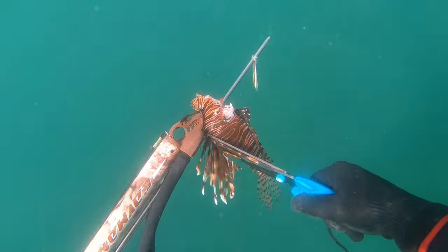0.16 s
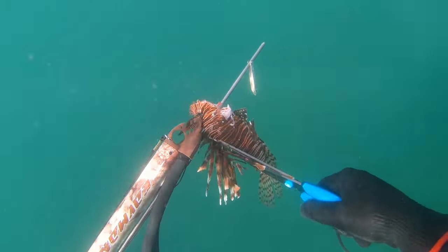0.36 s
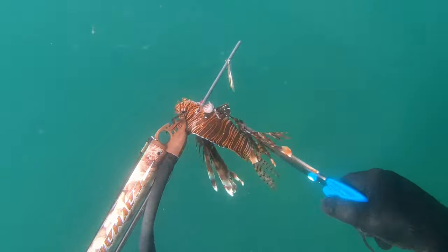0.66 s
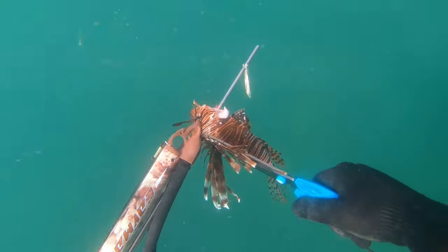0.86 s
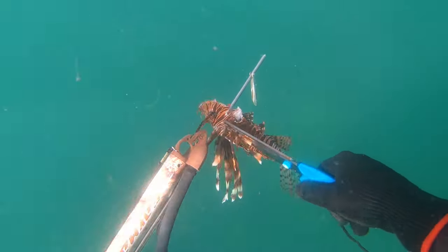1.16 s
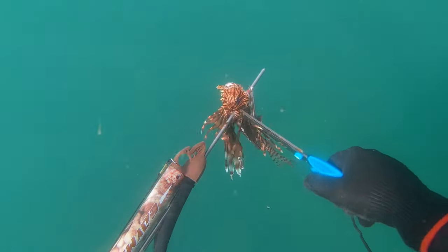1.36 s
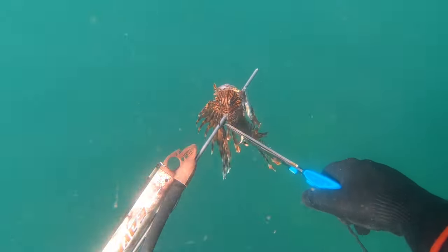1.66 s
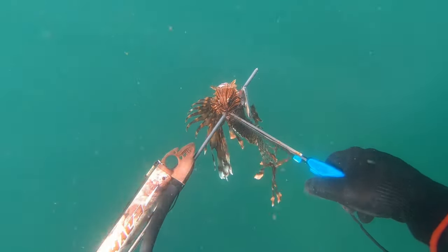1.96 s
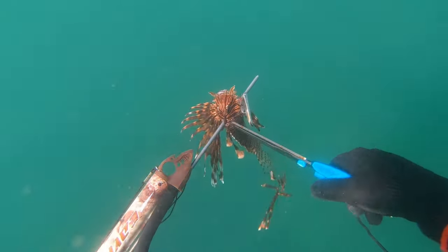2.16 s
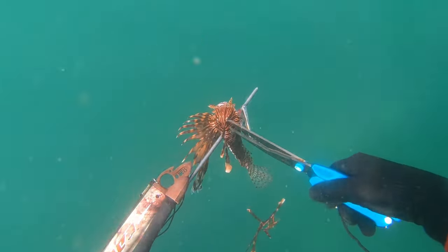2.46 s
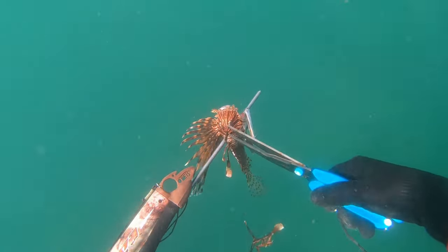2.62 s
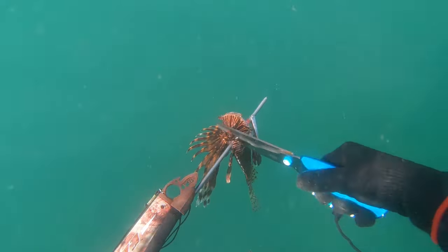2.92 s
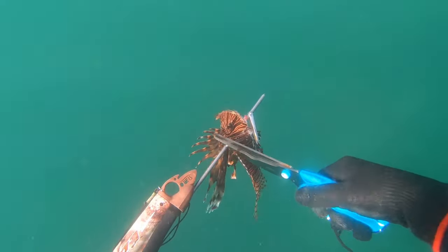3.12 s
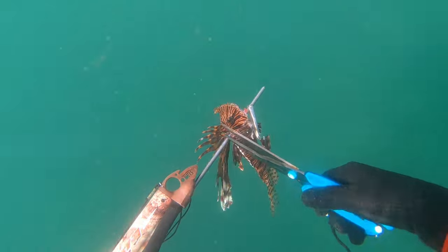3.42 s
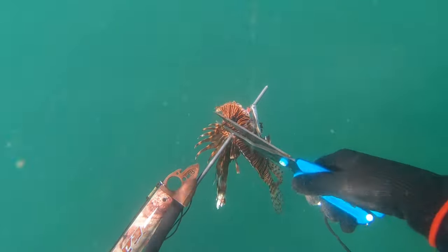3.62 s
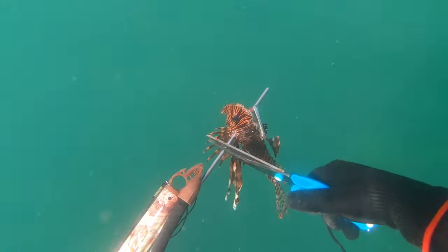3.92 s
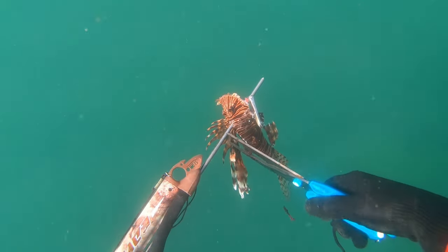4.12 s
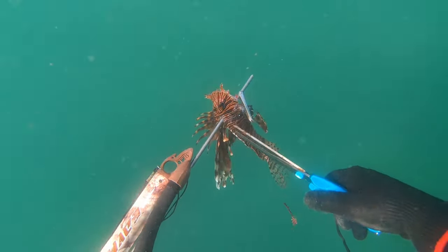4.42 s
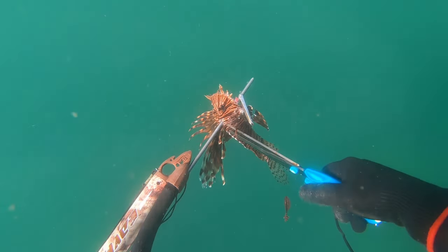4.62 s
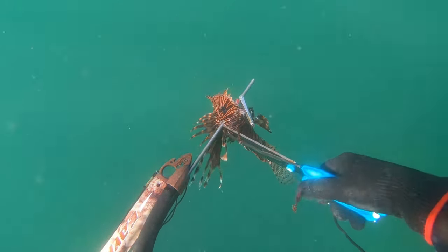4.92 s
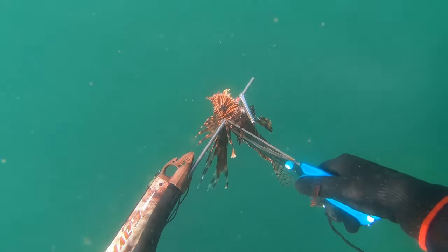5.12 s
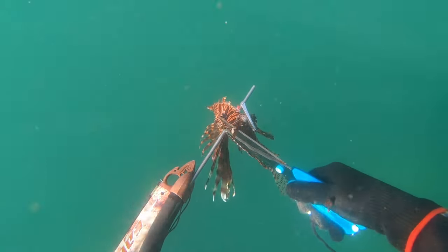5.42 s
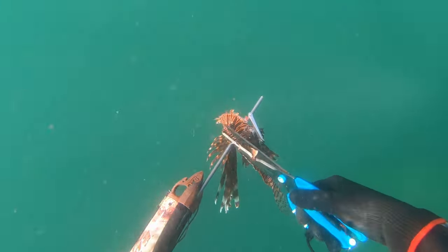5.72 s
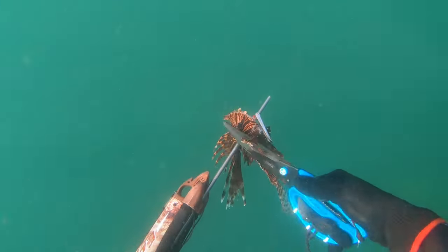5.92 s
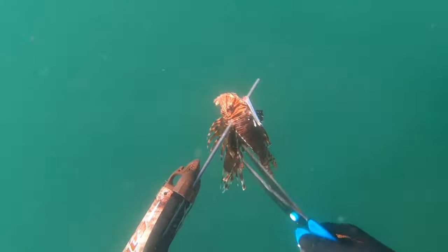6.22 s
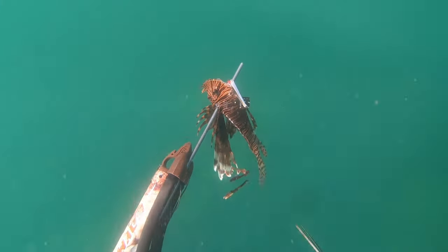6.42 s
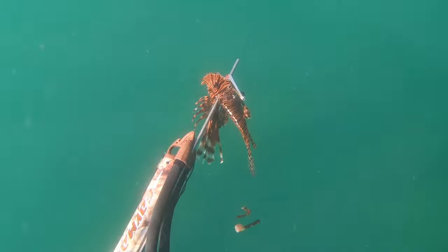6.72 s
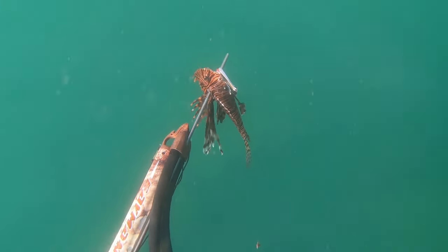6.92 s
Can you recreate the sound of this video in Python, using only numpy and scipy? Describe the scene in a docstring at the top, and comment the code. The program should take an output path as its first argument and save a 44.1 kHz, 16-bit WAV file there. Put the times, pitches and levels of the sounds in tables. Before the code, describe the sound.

Underwater, shears snip through fish spines with a few sharp crunches, over constant crackling shrimp snaps, a steady high hiss and faint low murmur.

```python
"""Under water by a spearfishing diver: shears trim the spines off a speared fish, heard in a camera housing.
Bursts of grainy force ring the shears as spines break; softer contacts ring the speargun, and steel
rubs along it as swelling resonant noise. Jolts are low fading sines, bubbles gliding ones.
Snapping shrimp crackle all around: a spike and rattle in the housing, then scatter from the seabed.
Behind them lie a hiss of distant snaps, a low murmur and lumpy eddies, all shaped from noise."""
import sys
import numpy as np
from scipy import signal
from scipy.fft import rfft, irfft, next_fast_len
from scipy.io import wavfile
from scipy.ndimage import uniform_filter1d

SR = 44100
rng = np.random.default_rng(int(sys.argv[2]) if len(sys.argv) > 2 else 0)


def output_pcm(signal):
    """Save a mono or channel-first signal as 16-bit PCM at the path in sys.argv[1].

    Samples are clipped to [-1, 1] before scaling.
    """
    pcm = np.clip(np.atleast_2d(signal).T, -1, 1) * 32767
    wavfile.write(sys.argv[1], SR, np.round(pcm).astype(np.int16))


N = 311787
TIME = np.arange(N) / SR

# blades going through a spine: (break time [s], level [dB], swell [s], fade [s], tilt [dB/octave])
SPINE_CUTS = [(0.2746, -15.5, 0.0039, 0.002, -3), (0.2979, -7, 0.00076, 0.00038, -3.5),
              (1.0536, -22, 0.00089, 0.001, -15), (1.0970, -29, 0.00036, 0.0042, -1),
              (3.0544, -28, 0.0094, 0.0011, -2.5), (3.795, -23, 0.0014, 0.0014, 0),
              (3.8120, -31, 0.01, 0.0011, -0.5), (3.8169, -22, 0.0024, 0.0011, -0.5),
              (3.8202, -24.5, 0.001, 0.0014, -3), (5.7572, -31, 0.0016, 0.0025, 8),
              (6.0286, -24, 0.00054, 0.0013, 6), (6.043, -31, 0.0061, 0.0066, -4),
              (6.051, -17, 0.0014, 0.0025, 4.5)]
# resonances of the shears: (centre [Hz], width [Hz], level [dB])
SHEARS_MODES = [(149, 134, -15.5), (357, 140, -24), (640, 170, -23.5), (886, 94, -20.5), (1394, 196, -20),
                (2284, 127, -7.5), (3000, 400, -8.5), (3440, 420, 1), (4070, 63, -11), (5083, 213, 3.5),
                (5520, 530, -6), (6900, 710, -14), (7840, 1000, -16), (10800, 3700, -41)]
# tools knocking on the spear: (time [s], level [dB], tilt [dB/octave])
SPEAR_KNOCKS = [(0.554, -53, -9), (1.053, -33, 1.5), (1.0970, -35.5, 0.5), (1.1110, -43, 2),
                (1.235, -42, 2), (3.0569, -45.5, 5), (3.442, -53, 0), (3.8190, -46, 9), (3.9738, -48.5, -3),
                (4.031, -44.5, -10), (4.1303, -41, 15), (4.165, -42.5, 16), (5.1336, -36.5, 13.5),
                (5.7546, -37, 16.5), (5.7950, -51, -1), (6.051, -38.5, 0), (6.2455, -62, 22),
                (6.2741, -42, 24), (6.892, -45.5, 18), (7.0433, -50, 5)]
# resonances of the speargun: (centre [Hz], width [Hz], level [dB])
SPEARGUN_MODES = [(298, 370, -0.5), (604, 76, 3), (880, 134, -2), (1414, 130, 11.5), (1540, 130, 1.5),
                  (1746, 49, 4), (2300, 750, -2), (3230, 420, -4.5)]
# strokes of the blades along the spear: (time of hardest press [s], level [dB], swell and fade [s])
BLADE_STROKES = [(.56, -54.5, 0.017), (1.18, -42.5, 0.016), (1.255, -60, 0.15), (4.10, -70, .012),
                 (4.22, -46.5, 0.019), (5.17, -60, 0.024), (5.89, -56, 0.13), (6.045, -41, 0.016),
                 (6.26, -51.5, 0.016), (7.06, -68, 0.054)]
# ring of the sliding blades: (centre [Hz], width [Hz], level [dB])
SLIDE_MODES = [(816, 240, -7.5), (1384, 95, 2), (1710, 250, -3), (2260, 150, -1), (3030, 1450, 0)]
# jolts through the diver's arm: (start time [s], level [dB], pitch [Hz], fade [s])
ARM_JOLTS = [(0.273, -38, 93, 0.021), (.296, -34.5, 35.5, 0.02), (0.925, -28, 58.5, 0.0097),
             (1.049, -41.5, 113, 0.013), (3.056, -42, 48, 0.023), (3.817, -47, 70, 0.025),
             (4.033, -41.5, 70, 0.0096), (5.731, -47.5, 103, 0.02), (6.054, -27, 46.7, 0.015)]
# loose bubbles: (start time [s], level [dB], starting pitch [Hz], glide [octaves/s], life [s])
LOOSE_BUBBLES = [(0.92, -42, 620, -23, 0.0059), (0.9257, -47.5, 396, -12, 0.014),
                 (0.928, -33, 106.4, -1.5, 0.053), (.9270, -40.5, 173, -12, 0.033),
                 (1.103, -42, 179, -15, 0.027), (1.2357, -34.5, 1400, -2, 0.0084),
                 (3.9739, -40, 1650, 9, 0.0081), (6.0102, -40, 454, 5, 0.092)]
# nearest shrimp, standing out of the crackle: (time [s], level [dB], tilt [dB/octave])
NEAR_SNAPS = [(0.3564, -36.5, -7.5), (.372, -35.5, -5), (0.468, -32.5, -6.5), (.5398, -38.5, -3),
              (.659, -34.5, -6.5), (0.739, -40, 11), (0.816, -34.5, 5), (0.9498, -36, 1), (1.1198, -39, -3),
              (1.2253, -38.5, -2), (1.3592, -40, 10), (1.3896, -36.5, -5), (1.4748, -35, 1),
              (1.5196, -33, -5.5), (1.5466, -32, -8), (1.5923, -35, 23), (1.615, -29.5, -4.5),
              (1.7073, -36, -8), (1.7168, -29.5, -11), (1.7517, -33, 3), (1.8088, -30.5, 6),
              (1.869, -38, 3), (1.8754, -34.5, 0), (1.8996, -39.5, -1), (1.9495, -37, -4),
              (1.9895, -28.5, -7.5), (2.0126, -53, 4), (2.0571, -37, 3), (2.0893, -35.5, -2.5),
              (2.1669, -26.5, -4), (2.2088, -32.5, 0.5), (2.2347, -30.5, -13.5), (2.2564, -42, -11),
              (2.3918, -38.5, 23), (2.433, -30, -5.5), (2.6249, -39, 19), (2.647, -31, -10),
              (2.6945, -33, 37), (2.7224, -37, 4.5), (2.77, -37, 10), (2.8483, -31, -9),
              (2.8702, -33, -3.5), (2.9163, -31, -5), (3.1543, -31.5, 11), (3.3951, -29.5, 1.5),
              (3.4405, -35, -14.5), (3.5143, -35, -6.5), (3.5885, -41, 22), (3.6165, -35.5, -0.5),
              (3.9154, -37.5, 2), (4.0525, -23.5, -6), (4.121, -37, -6), (4.1297, -36, -10),
              (4.1951, -31.5, -11), (4.3686, -38, -5), (4.4588, -39.5, 13), (4.4897, -41.5, 3),
              (4.5136, -34.5, 6), (4.6236, -28, -2), (4.8153, -39, 3.5), (5.2124, -37.5, 3),
              (5.2896, -26.5, -2.5), (5.4017, -39.5, -5), (5.461, -30, -10), (5.6472, -36.5, 6),
              (5.6912, -37, -5.5), (5.7927, -38, 7), (5.8504, -38.5, -2), (5.8886, -31, -2),
              (5.9698, -36.5, -.5), (6.0028, -33.5, -8), (6.148, -35.5, -1.5), (6.1907, -39, 24),
              (6.2134, -35.5, -4), (6.2535, -31.5, -7), (6.2654, -28.5, -4), (6.337, -40, -6),
              (6.434, -38, -8.5), (6.4939, -38.5, 2), (6.724, -41, -5.5), (6.7833, -38.5, -2)]
# resonances of the camera housing: (centre [Hz], width [Hz], level [dB])
HOUSING_MODES = [(1420, 98, -28), (1870, 110, -32), (2330, 195, -20.5), (2765, 330, -16.5), (3244, 286, -6),
                 (3690, 596, -7), (5046, 183, 0), (5392, 470, 1), (6806, 790, -2), (7640, 330, -8.5),
                 (8274, 495, -5), (9230, 830, -14.5), (10400, 2700, -28), (14600, 2900, -41)]
# arm sweeps pushing water past the housing: (time of fastest moment [s], level [dB], swell and fade [s])
ARM_SWEEPS = [(.32, -57, 0.085), (.57, -55, 0.14), (1.12, -54, 0.18), (2.91, -63, 0.12), (3.63, -65, 0.23),
              (4.29, -52, .11), (4.46, -52, .06), (4.58, -59.5, 0.068), (5.77, -56.5, 0.096),
              (6.29, -56, 0.039), (6.67, -59, 0.088), (6.88, -52.5, 0.34)]
# relative spectrum of eddies on the housing: (frequency [Hz], density [dB per Hz])
EDDY_COLOUR = [(12, -38), (20, -38), (59, 8.5), (92, -12), (141, 1.5), (206, -3.5), (261, -17), (422, -18),
               (565, -26.5), (670, -16.5), (1010, -38), (1200, -30), (1560, -63), (2640, -120)]
# relative spectrum of the still sea: (frequency [Hz], density [dB per Hz])
STILL_SEA_COLOUR = [(8.8, -41), (15, 3.5), (64, -5), (87, -24), (173, -3), (233, -11.5), (266, -15.5),
                    (297, -14), (352, -21), (416, -19.5), (572, -22), (771, -17), (1100, -28), (1300, -27),
                    (1690, -62), (2860, -120)]
# stereo width by frequency: (frequency [Hz], side relative to mid [dB])
SIDE_COLOUR = [(60, -53), (400, -28), (1200, -33), (3000, -53), (5000, -34), (8000, -30), (10000, -24.5),
               (12000, -5.5), (15000, 0)]
# relative spectrum of the microphones' own hiss: (frequency [Hz], level [dB])
SELF_NOISE_COLOUR = [(100, 5), (1000, -2), (9000, -1), (12500, 3), (14500, 0), (15800, -12)]

SLIDE_FLOOR_DB = -69  # faint noise in the slide's colour beneath the strokes
# a typical near snap, its seabed scatter, and dB of scatter per dB of snap:
# scatter weakens more slowly with distance than the snap itself
TYPICAL_SNAP_DB, SCATTER_DB, SCATTER_FOLLOWS = -34.5, -44.5, 0.57
# the rest of the colony is spread evenly over the seabed between two distances
COLONY_NEAR_M, COLONY_FAR_M = 3.22, 8.4
COLONY_NEAR_DB, COLONY_SCATTER_DB = -40.5, -53.5  # a snap from the near edge; scatter of every snap
COLONY_TILT_DB, COLONY_TILT_SPREAD_DB = 5.5, 10.5  # mean and standard deviation, dB per octave
HISS_DB, SEA_DB, SELF_NOISE_DB = -55.5, -63, -82.5  # distant snaps, still sea, microphone hiss
CUTOFF_HZ = 15900


def cuts():
    """The blades squeeze each spine until it breaks, ringing the shears."""
    s, db, swell, fade, tilt = np.transpose(SPINE_CUTS)
    return crunch(s, db, swell, fade, tilt, SHEARS_MODES, grain_db=3.5, break_db=9.5, tilt_from_hz=1450)


def knocks(contact_s=0.00013, fade_s=0.0075):
    """Dull contacts ring the speargun: a very short onset, then a longer grainy fade."""
    s, db, tilt = np.transpose(SPEAR_KNOCKS)
    swell = np.full(len(s), contact_s)
    fade = np.full(len(s), fade_s)
    return crunch(s, db, swell, fade, tilt, SPEARGUN_MODES, grain_db=4.5, break_db=15.5, tilt_from_hz=900)


def crunch(s, db, swell, fade, tilt, modes, grain_db, break_db, tilt_from_hz, size=6144):
    """Dense tiny fractures or slips build to one sharp break, die away and ring a body."""
    lead = size // 3  # samples of build-up before the break
    t = (np.arange(size) - lead) / SR
    force = np.exp(np.minimum(t / swell[:, None], -t / fade[:, None]))
    grain_gain = from_db(grain_db * rng.standard_normal(force.shape))
    grains = rng.standard_normal(force.shape) * grain_gain
    grains[:, lead] = from_db(break_db)
    rung = through(force * grains, modes, tilt, low_cut_hz=6.9, tilt_from_hz=tilt_from_hz)
    energy = np.sum(force ** 2, axis=1, keepdims=True)
    return place(s - lead / SR, from_db(db)[:, None] * with_energy(rung, energy))


def slide():
    """Steel rubs along the spear in uneven slips, heard as resonant noise that swells with the press."""
    press = np.hypot(swells(BLADE_STROKES), from_db(SLIDE_FLOOR_DB))
    slips = press * uneven(spread_db=2.0, lump_s=0.018)
    return slips * noise(lambda hz: resonances(SLIDE_MODES, hz))


def jolts(push_s=0.0013, size=8192):
    """The camera mount sways after each push through the diver's arm: a low sine that soon fades."""
    s, db, hz, fade = np.transpose(ARM_JOLTS)[:, :, None]
    t = np.arange(size) / SR
    envelope = (1 - np.exp(-t / push_s)) * np.exp(-t / fade)
    return place(s[:, 0], from_db(db) * envelope * np.sin(2 * np.pi * hz * t))


def bubbles(birth_s=0.00039, size=8192):
    """Each pocket of air rings at one pitch that glides as its shape and depth change."""
    s, db, hz, glide, life = np.transpose(LOOSE_BUBBLES)[:, :, None]
    t = np.arange(size) / SR
    pitch_hz = hz * 2 ** (glide * np.minimum(t, 2 * life))  # the glide stops after two lives
    phase = 2 * np.pi * np.cumsum(pitch_hz, axis=1) / SR
    envelope = (1 - np.exp(-t / birth_s)) * np.exp(-(t / life) ** 4.4)
    return place(s[:, 0], from_db(db) * envelope * np.sin(phase))


def near_shrimp():
    """Single snaps close by: the louder the snap, the drier it sounds against its scatter."""
    s, db, tilt = np.transpose(NEAR_SNAPS)
    scatter_db = SCATTER_DB + SCATTER_FOLLOWS * (db - TYPICAL_SNAP_DB)
    return snaps(s, db, tilt, scatter_db)


def far_shrimp(count=420):
    """The rest of the colony: random snaps, fainter with distance, over a hiss of countless farther ones."""
    when, area, colour = rng.random((count, 3)).T
    distance_m = np.sqrt(COLONY_NEAR_M ** 2 + area * (COLONY_FAR_M ** 2 - COLONY_NEAR_M ** 2))
    db = COLONY_NEAR_DB - 20 * np.log10(distance_m / COLONY_NEAR_M)
    tilt = COLONY_TILT_DB + COLONY_TILT_SPREAD_DB * np.sqrt(3) * (2 * colour - 1)
    crackle = snaps(when * N / SR, db, tilt, np.full(count, COLONY_SCATTER_DB))
    hiss = noise(lambda hz: resonances(HOUSING_MODES, hz))
    return crackle + from_db(HISS_DB) * hiss


def snaps(s, db, tilt, echo_db, rattle_s=0.0014, rattle_spread_db=2, direct=3.0,
          echo_s=0.012, echo_delay_s=0.0034, echo_grain_db=3.5, echo_tilt_share=0.93,
          low_cut_hz=1300, tilt_from_hz=1900, size=2048):
    """A collapsing cavity: one spike, a rattle of its own length inside the housing, then seabed scatter."""
    t = np.arange(size) / SR
    rattle, scatter, chance = rng.standard_normal((len(s), 3, size)).swapaxes(0, 1)
    rattle_length_s = rattle_s * from_db(rattle_spread_db * chance[:, :1])
    crack = rattle * np.exp(-(t / rattle_length_s) ** 2)
    crack[:, 0] = direct  # the spike
    echo_envelope = np.exp(-t / echo_s) * np.minimum(t / echo_delay_s, 1) ** 2
    echo = scatter * from_db(echo_grain_db * chance) * echo_envelope
    crack = through(crack, HOUSING_MODES, tilt, low_cut_hz, tilt_from_hz)
    echo = through(echo, HOUSING_MODES, echo_tilt_share * tilt, low_cut_hz, tilt_from_hz)
    crack = with_energy(crack, 0.0043 * SR)
    echo = with_energy(echo, 0.011 * SR)
    return place(s, from_db(db)[:, None] * crack + from_db(echo_db)[:, None] * echo)


def water():
    """A steady low murmur of the sea, and lumpy eddies on the housing when the diver moves."""
    flow = swells(ARM_SWEEPS) * uneven(spread_db=2.0, lump_s=0.039)
    eddies = flow * coloured(EDDY_COLOUR)
    murmur = from_db(SEA_DB) * coloured(STILL_SEA_COLOUR)
    return murmur + eddies


def swells(rows):
    """Gain of a series of movements: each grows to its peak and dies away at the same rate."""
    return np.sqrt(sum((from_db(db) * np.exp(-np.abs(TIME - s) / fade)) ** 2 for s, db, fade in rows))


def uneven(spread_db, lump_s):
    """A gain that wanders at random, in lumps of a given length."""
    lump_samples = max(int(lump_s * SR), 1)
    lumps = rms_one(uniform_filter1d(rng.standard_normal(N), lump_samples))
    return from_db(spread_db * lumps)


def through(forces, modes, tilts, low_cut_hz, tilt_from_hz, tilt_to_hz=8500):
    """Each row of forces rings a body; a bright one is lifted up to a limit, a dull one keeps falling."""
    hz = bins(forces.shape[-1])
    lift = causal(from_db(np.log2(np.clip(hz, tilt_from_hz, tilt_to_hz))))
    fall = causal(from_db(np.log2(np.maximum(hz, tilt_from_hz))))
    low_cut = (hz / np.hypot(hz, low_cut_hz)) ** 2
    body = causal(resonances(modes, hz) * low_cut)
    tilts = tilts[:, None]
    slope = tilts * np.where(tilts > 0, lift, fall)
    return irfft(rfft(forces) * np.exp(body + slope))


def resonances(modes, hz, skirt=1.43):
    """Gain of a body: steep-sided peaks added in power."""
    centre, width, db = np.transpose(modes)[:, :, None]
    peaks = from_db(db) / (1 + ((hz - centre) / width) ** 2) ** skirt
    return np.sqrt(np.sum(peaks ** 2, axis=0))


def causal(gain):
    """Log response of the minimum-phase filter with this gain: nothing rings early."""
    cepstrum = irfft(np.log(gain))
    half = len(cepstrum) // 2
    cepstrum[1:half] *= 2
    cepstrum[half + 1:] = 0
    return rfft(cepstrum)


def noise(gain_at):
    """Noise of rms 1 whose spectrum follows a function of Hz."""
    size = 2 * next_fast_len(N // 2 + 1)
    spectrum = rfft(rng.standard_normal(size)) * gain_at(bins(size))
    return rms_one(irfft(spectrum)[:N])


def coloured(points):
    """Noise of rms 1 with a spectrum given as points of (frequency [Hz], level [dB])."""
    return noise(lambda hz: curve(points, hz))


def curve(points, at_hz):
    """Gain read from points joined by straight lines of dB over log frequency."""
    hz, db = np.transpose(points)
    return from_db(np.interp(np.log(at_hz), np.log(hz), db))


def place(starts, waves):
    """Short sounds laid on the time line."""
    out = np.zeros(N + waves.shape[-1])
    for at, wave in zip(np.clip(starts * SR, 0, N).astype(int), waves):
        out[at:at + len(wave)] += wave
    return out[:N]


def with_energy(waves, energy):
    """Each row scaled to a given sum of squares."""
    return rms_one(waves) * np.sqrt(energy / waves.shape[-1])


def rms_one(x):
    """Each row scaled to rms 1."""
    return x / np.sqrt(np.mean(x ** 2, axis=-1, keepdims=True) + 1e-20)


def bins(size):
    """Frequencies in Hz of a spectrum of this many samples, kept at 1 Hz or above."""
    return np.maximum(np.arange(size // 2 + 1) * SR / size, 1)


def from_db(db):
    """Decibels to gain."""
    return 10 ** (np.asarray(db) / 20)


def scene(side_delay_s=0.00043):
    """All layers; a delayed, coloured copy, opposite in sign in each channel, widens mostly the top treble."""
    diver = cuts() + knocks() + slide() + jolts()
    shrimp = near_shrimp() + far_shrimp()
    mid = diver + bubbles() + shrimp + water()
    size = 2 * next_fast_len(N // 2 + SR // 10)
    hz = bins(size)
    side_response = causal(curve(SIDE_COLOUR, hz)) - 2j * np.pi * hz * side_delay_s
    side = irfft(rfft(mid, size) * np.exp(side_response))[:N]
    return mid + side * np.array([[1], [-1]])


def record(dry):
    """Each microphone has a faint hiss of its own; the top is cut."""
    hiss = np.array([coloured(SELF_NOISE_COLOUR), coloured(SELF_NOISE_COLOUR)])
    wet = dry + from_db(SELF_NOISE_DB) * hiss
    top_cut = signal.ellip(10, .1, 80, CUTOFF_HZ, fs=SR, output="sos")
    return signal.sosfilt(top_cut, wet)


dry = scene()
out = record(dry)
output_pcm(out)
```